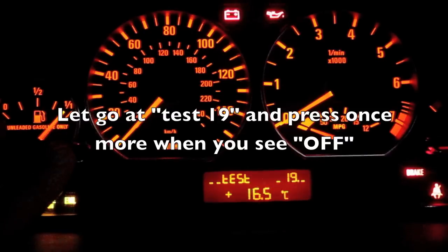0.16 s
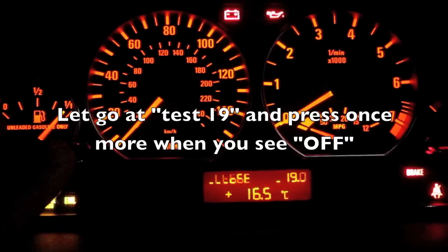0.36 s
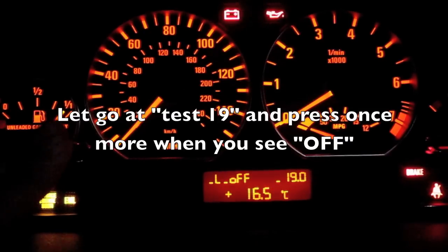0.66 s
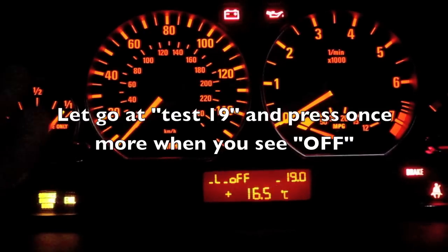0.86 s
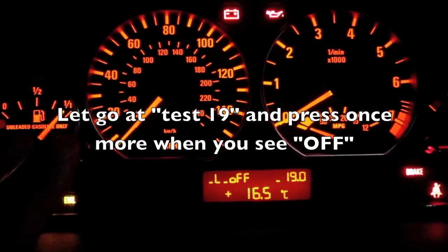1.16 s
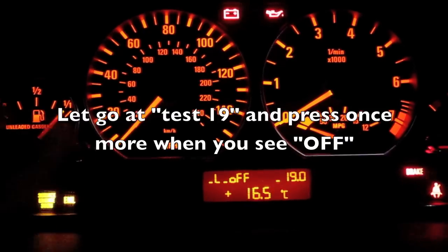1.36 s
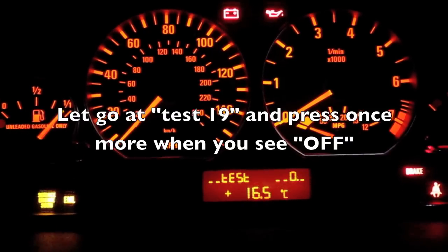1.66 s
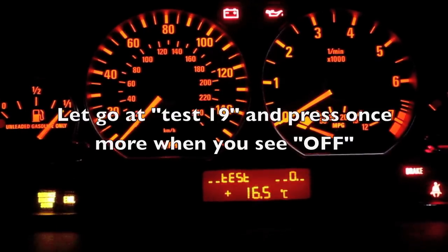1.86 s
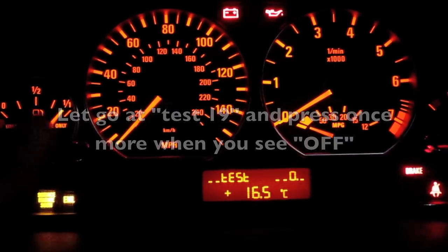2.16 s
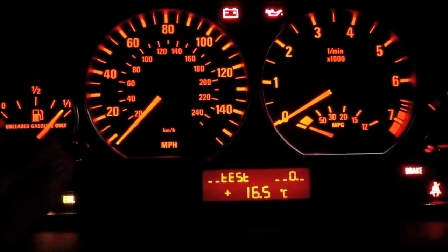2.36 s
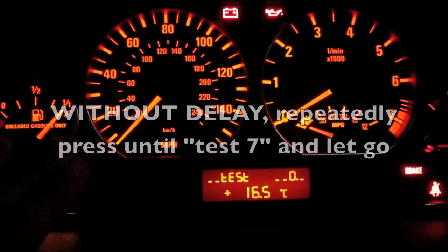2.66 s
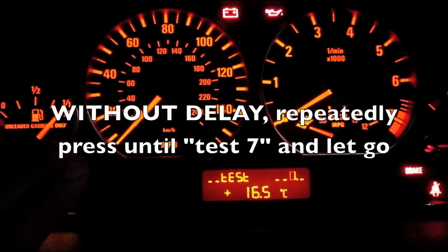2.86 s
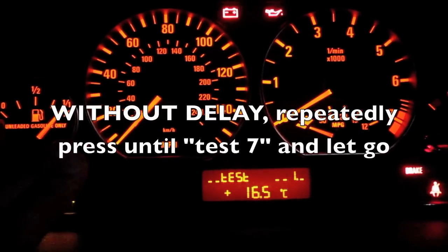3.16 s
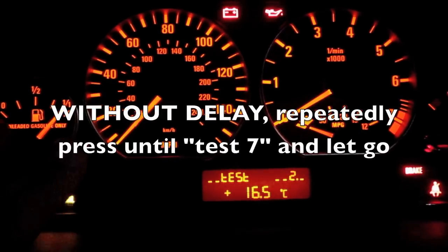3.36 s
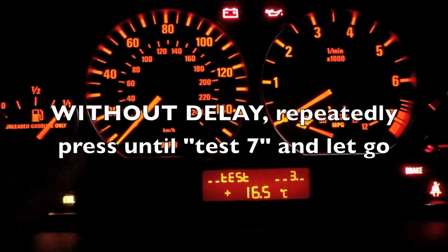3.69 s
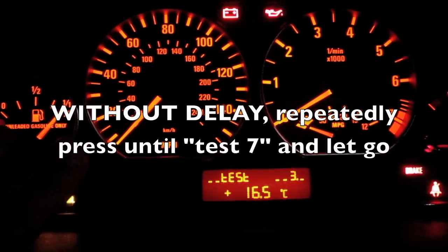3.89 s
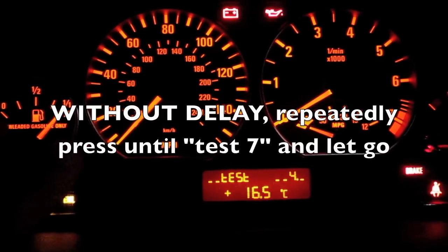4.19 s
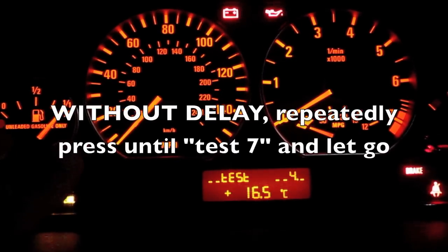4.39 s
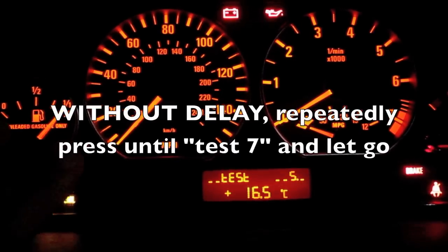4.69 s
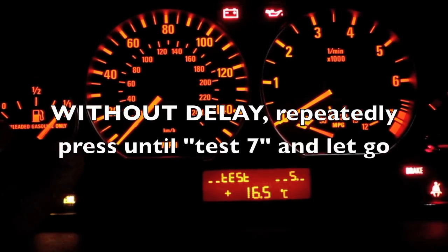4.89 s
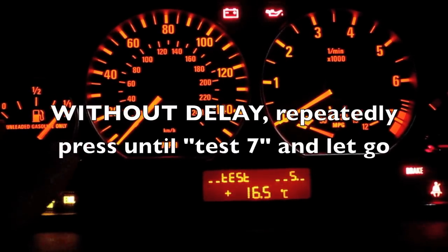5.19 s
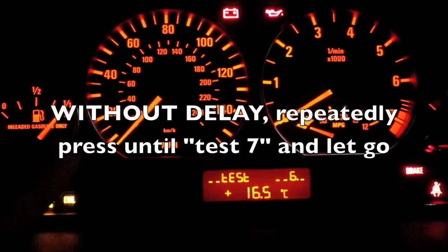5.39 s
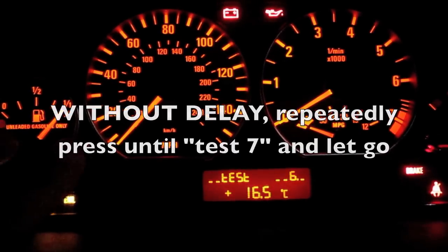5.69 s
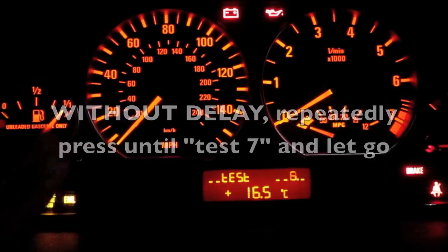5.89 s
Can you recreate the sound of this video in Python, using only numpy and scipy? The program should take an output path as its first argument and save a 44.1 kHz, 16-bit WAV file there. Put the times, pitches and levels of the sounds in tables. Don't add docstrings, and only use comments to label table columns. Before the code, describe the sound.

A small plastic dashboard button is clicked eight times inside a quiet parked car, each press a snap and knock, over a low wavering hum.

```python
import sys
import numpy as np
from scipy import signal
from scipy.fft import rfft, irfft
from scipy.io import wavfile

SR = 44100
rng = np.random.default_rng(int(sys.argv[2]) if len(sys.argv) > 2 else 0)


def level_to_linear(level):
    exponent = np.asarray(level, float) / 20
    return 10 ** exponent


def to_wav(s):
    ch = np.atleast_2d(s).T
    pcm = np.round(np.clip(ch, -1, 1) * 32767)
    wavfile.write(sys.argv[1], SR, pcm.astype(np.int16))


N = 266452


def rms_one(x):
    return x / np.sqrt(np.mean(x ** 2) + 1e-20)


def ring(x, hz, t60_s):
    radius, turn = level_to_linear(-60 / (t60_s * SR)), 2 * np.pi * hz / SR
    return signal.lfilter([0, np.sin(turn)], [1, -2 * radius * np.cos(turn), radius ** 2], x + 1e-18)


def coloured(points):
    hz, level_db = np.transpose(points)
    log_hz = np.log(np.arange(N // 2 + 1) * SR / N + 1)
    shape = level_to_linear(np.interp(log_hz, np.log(hz), level_db, left=-99, right=-99))
    return rms_one(irfft(rfft(rng.standard_normal(N)) * shape, N))


def wavering(hz, width_hz):
    return rms_one(ring(rng.standard_normal(N), hz, 3.2 / width_hz))


# (frequency [Hz], density [dB per Hz])
HISS_SPECTRUM = [(600, -0.5), (1500, 3), (3000, -4.5), (6300, -5.5), (9000, -5), (12400, -6.5),
                 (15600, -14.5), (16000, -55), (16500, -58)]


def microphone_hiss():
    return level_to_linear(-60.5) * coloured(HISS_SPECTRUM)


# (frequency [Hz], density [dB per Hz])
RUMBLE_SPECTRUM = [(8, -25), (14, -44), (25, -10), (36, -23), (45, 0), (60, -4), (100, -11), (160, -14),
                   (190, -15.5), (270, -22), (430, -27), (1500, -40), (2000, -48)]
# (frequency [Hz], width [Hz])
CABIN_HUMS = [(48.5, 4), (73, 6)]
# (frequency [Hz], width [Hz], level [dB])
CABIN_DRONES = [(103.2, 16, -55.5), (139.5, 3.8, -59.5)]
# (time [s], level [dB])
CABIN_SWAY = [(0.0, -30), (0.03, -48.5), (0.49, -53), (0.54, -62.5), (2.39, -46), (2.47, -49.5),
              (4.05, -43.5), (4.27, -54), (5.63, -47.5), (5.7, -61), (5.9, -52), (6.04, -61)]


def cabin_floor():
    t = np.arange(N) / SR
    sway_db = np.interp(t, *np.transpose(CABIN_SWAY))
    swing_db = sway_db - sway_db.mean()
    low_hum, high_hum = CABIN_HUMS
    out = level_to_linear(-46 + 0.05 * swing_db) * coloured(RUMBLE_SPECTRUM)
    out += level_to_linear(sway_db + 1.5) * wavering(*low_hum)
    out += level_to_linear(-52 - 0.37 * swing_db) * wavering(*high_hum)
    out += sum(level_to_linear(level_db) * wavering(hz, width_hz) for hz, width_hz, level_db in CABIN_DRONES)
    whine = np.sqrt(2) * np.sin(2 * np.pi * 15734 * t)
    return out + level_to_linear(-89) * whine


# (start [s], end [s], frequency [Hz], level [dB])
SPRING_SQUEAKS = [(1.225, 1.23, 5100, -58), (2.971, 2.993, 5720, -56), (2.973, 2.985, 3860, -63),
                  (2.99, 3.013, 5020, -57), (3.562, 3.573, 4100, -56), (3.805, 3.822, 4900, -58),
                  (4.27, 4.29, 5100, -58), (4.475, 4.49, 5070, -60), (4.935, 4.964, 6550, -59),
                  (5.543, 5.6, 6400, -62), (5.548, 5.588, 4920, -63), (5.608, 5.648, 5140, -58)]


def spring_squeaks():
    out, white = np.zeros(N), rng.standard_normal(N)
    for start_s, end_s, hz, level_db in SPRING_SQUEAKS:
        part = slice(int(start_s * SR), int(end_s * SR))
        whistle = rms_one(ring(ring(white[part], hz, 0.018), hz, 0.013))
        out[part] += level_to_linear(level_db) * whistle * np.hanning(len(whistle)) ** 0.5
    return out


# (frequency [Hz], width [Hz], level [dB])
SPRING_COILS = [(3120, 190, 1), (4110, 340, -4.5), (5100, 160, -2.5), (6440, 140, 1), (10100, 300, -11),
                (11600, 270, -12)]


def coil_hiss():
    drive = rng.standard_normal((len(SPRING_COILS), N))
    flicker = signal.lfilter([1], [1, -1.996, 0.996004], drive)
    out = np.zeros(N)
    for (hz, width_hz, level_db), own in zip(SPRING_COILS, flicker):
        out += level_to_linear(level_db + 6 * rms_one(own)) * wavering(hz, width_hz)
    return rms_one(out)


def stem_slips():
    slips = rng.random(N) < 700.0 / SR
    slips = slips * level_to_linear(0.83 * np.minimum(rng.exponential(1, N), 3))
    pitches_hz, dealt = np.geomspace(900, 6800, 16), rng.integers(0, 16, N)
    return rms_one(sum(ring(slips * (dealt == k), hz, 0.0071) for k, hz in enumerate(pitches_hz)))


def strokes():
    pushes = [(s - travel_s, s + 0.014, rub_db - 1, rub_db, -10.5)
              for s, _, _, travel_s, rub_db in BOTTOMINGS]
    slides = [(s + 0.0015, s + 0.066, first_db, last_db, -12.5)
              for s, _, first_db, last_db in LIFT_OFFS]
    return pushes + slides


# (frequency [Hz], density [dB per Hz])
RUB_SPECTRUM = [(300, -5), (1000, 7), (2000, -3.5), (3600, -15), (4200, -8), (4600, -10.5), (5050, -8),
                (5600, -8), (6400, -7), (6900, -16.5), (7600, -5)]
# (frequency [Hz], density [dB per Hz])
SCRATCH_SPECTRUM = [(8000, 5), (10000, 4), (13000, -1), (15500, -10)]


def stem_travel():
    out, t = np.zeros(N), np.arange(N) / SR
    grip = signal.lfilter([1], [1, -1.98, 0.9801], rng.standard_normal(N))
    grain = level_to_linear(2.8 * rms_one(grip))
    rub = rms_one(grain * coloured(RUB_SPECTRUM) + level_to_linear(-6.5) * stem_slips())
    rub += level_to_linear(-13.5) * coil_hiss()
    scratch = rms_one(grain * coloured(SCRATCH_SPECTRUM))
    for start_s, end_s, start_db, end_db, bright_db in strokes():
        part = slice(int((start_s - 0.03) * SR), int((end_s + 0.04) * SR))
        corners_s = [start_s - 0.008, start_s + 0.004, end_s - 0.003, end_s + 0.008]
        level = np.interp(t[part], corners_s, [0, level_to_linear(start_db), level_to_linear(end_db), 0])
        out[part] += level * (rub[part] + level_to_linear(bright_db) * scratch[part])
    return out


# (time [s], knock [dB], panel thud re knock [dB], prior travel [s], rub [dB])
BOTTOMINGS = [
    (1.235, -23, -5, 0.039, -45.5),
    (2.643, -20, -8, 0.06, -50.5),
    (3.028, -20.5, -8, 0.059, -52.5),
    (3.448, -21, -8, 0.077, -55.5),
    (3.851, -23, -5, .063, -52),
    (4.317, -21.5, -6.5, 0.075, -55.5),
    (5.001, -18.5, -10, 0.072, -50.5),
    (5.64, -19.5, -9, 0.14, -58.5),
]
# (time [s], knock [dB], first rub [dB], last rub [dB])
LIFT_OFFS = [
    (1.381, -25.5, -44.5, -56),
    (2.735, -24, -50, -76),
    (3.142, -24, -50.5, -70),
    (3.553, -24, -51.5, -63),
    (3.979, -24.5, -51.5, -52.5),
    (4.447, -25, -53.5, -56.5),
    (5.129, -24, -50, -49.5),
    (5.781, -24.5, -52, -43.5),
]
# (time [s], knock [dB], panel thud re knock [dB], hardness [dB per octave])
UPPER_STOPS = [
    (1.422, -16.5, -13, -1.5),
    (2.81, -44.5, 9.5, -5),
    (3.211, -30.5, -1.5, -6.5),
    (3.739, -26, -6.5, -7.5),
    (4.046, -16.5, -9, -3),
    (4.533, -16, -13.5, 5.5),
    (5.197, -21.5, -10, -5),
    (5.835, -20, -7.5, -7),
]
# (time [s], knock [dB], panel thud re knock [dB], hardness [dB per octave])
FINGER_TOUCHES = [(1.107, -35, -7.5, -5), (1.159, -40.5, -6, -4), (1.198, -35, -24, 3), (2.26, -35, -2, 3),
                  (2.387, -43, -17, 3), (2.4, -30, -7, -3.5), (2.509, -47, -2.5, 0), (2.589, -35, -20, 9),
                  (2.716, -40, -6.5, -9), (2.799, -45, -4, -6), (3.118, -42.5, -6, -6),
                  (3.314, -44, -7, -9), (3.691, -30, -40, -6), (4.157, -33, -21, -4),
                  (4.505, -33.5, -20, -8), (4.92, -41, -17, -1), (5.094, -42.5, -4.5, -7),
                  (5.307, -50, 0, -5), (5.746, -49.5, -4, 2)]
# (time [s], knock [dB], stem tick re knock [dB], dome rattle re knock [dB])
STEM_CATCHES = [(1.216, -35.5, -8, -9), (1.286, -35.5, -7, -3.5), (1.294, -25, -2.5, -11),
                (2.607, -43, 0, -3.5), (2.875, -37, -4, -12), (2.995, -40.5, -8, -4),
                (3.825, -38.5, -7, -8.5), (4.293, -40, -4, -6.5), (4.486, -41, -3.5, -19),
                (4.971, -40.5, -4, -8), (5.814, -30.5, -6, -22)]


def contacts():
    rows = [(s, db, -7, -22, -44, -8, 1) for s, db, *_ in LIFT_OFFS]
    rows += [(s, db, panel_db, -17, -10, -4.5, 0) for s, db, panel_db, *_ in BOTTOMINGS]
    rows += [(s, db, panel_db, -20, -40, hard_db, 1) for s, db, panel_db, hard_db in UPPER_STOPS]
    rows += [(s, db, panel_db, -23.5, -33, hard_db, 1) for s, db, panel_db, hard_db in FINGER_TOUCHES]
    rows += [(s, db, -13.5, stem_db, dome_db, 8.5, 0) for s, db, stem_db, dome_db in STEM_CATCHES]
    return np.transpose(rows)


def alike(kinds, size):
    likeness = 0.6
    shared = rng.standard_normal((2, size))
    own = rng.standard_normal((len(kinds), size))
    return likeness * shared[kinds] + np.sqrt(1 - likeness ** 2) * own


def struck(modes, share_db, chatter_s, chatter_db, spread_db, tail_t60_s, tail_db, band_hz, rise_s,
           grip, hard_share):
    at_s, peak_db, *_, hard_db, still = contacts()
    kinds, lag = still.astype(int), np.arange(4500)
    force = level_to_linear(chatter_db) * np.exp(-lag / (chatter_s * SR))
    force = force + level_to_linear(tail_db - 60 * lag / (tail_t60_s * SR))
    force = force * alike(kinds, size=len(lag))
    force[:, 0] = 1

    hz, press_db, release_db, t60_s = np.transpose(modes)
    held_hz = hz * (1 + 0.018 * alike(kinds, size=len(modes)))
    decay = level_to_linear(-60 * lag / (grip * t60_s[:, None] * SR))
    rings = decay * np.sin(2 * np.pi * held_hz[..., None] * lag / SR)
    rings *= 1 - np.exp(-lag / (rise_s * SR))
    strength_db = np.array([press_db, release_db])[kinds]
    strength_db = strength_db + hard_share * hard_db[:, None] * np.log2(hz / hz.mean())
    strength_db = strength_db + spread_db * alike(kinds, size=len(modes))
    bodies = np.sum(level_to_linear(strength_db)[..., None] * rings, axis=1)

    knocks = signal.fftconvolve(force, bodies, axes=1)[:, :len(lag)]
    radiating = signal.butter(2, band_hz, "band", fs=SR, output="sos")
    knocks = signal.sosfilt(radiating, knocks)
    knocks /= np.sqrt(np.mean(knocks[:, :600] ** 2, axis=1, keepdims=True))
    knocks *= level_to_linear(peak_db + share_db)[:, None]
    out = np.zeros(N + len(lag))
    np.add.at(out, np.round(at_s[:, None] * SR).astype(int) + lag, knocks)
    return out[:N]


# (frequency [Hz], on press [dB], on release [dB], t60 [s])
PANEL_MODES = [(133.4, -9.5, -16, 0.077), (204, -10, -12, 0.061), (263, -18, -13, 0.087),
               (363, -20.5, -10.5, 0.053), (410.8, -7.5, -4.5, 0.074), (434, -1.5, -3.5, 0.087),
               (483, -3, -1.5, 0.076), (557.6, 1, -1.5, 0.089), (612, 0, -4, 0.084),
               (674, -7.5, -11.5, 0.066)]


def panel(panel_db):
    return struck(PANEL_MODES, panel_db - 1, chatter_s=0.001, chatter_db=-32.5, spread_db=2.5,
                  tail_t60_s=0.14, tail_db=-43.5, band_hz=[139, 700], rise_s=0.0022, grip=0.75, hard_share=0.9)


# (frequency [Hz], on press [dB], on release [dB], t60 [s])
CAP_MODES = [(936, -27.5, -10, 0.22), (969, -9.5, -5, 0.088), (1053.6, -5, -6.5, 0.083),
             (1090, -32, 0, 0.063), (1234, 8, 5.5, 0.031), (1339, 5.5, 12, 0.031), (1483, 6, 8.5, 0.019),
             (1582, 12, 9, 0.02), (1696, 0.5, 8, 0.018), (1860, -4, -3, 0.055), (2074, 4, 2, 0.037),
             (2200, -43, -1, 0.017)]


def cap():
    return struck(CAP_MODES, -13.0, chatter_s=0.00072, chatter_db=-16.5, spread_db=3.0,
                  tail_t60_s=0.065, tail_db=-27.5, band_hz=[760, 2620], rise_s=0.00052, grip=0.7, hard_share=1.3)


# (frequency [Hz], on press [dB], on release [dB], t60 [s])
STEM_MODES = [(2360, 6, 8, 0.0095), (2876, 5, 7, 0.011), (3330, 5.5, 10, 0.0083), (3670, -21, -13, 0.0012),
              (4100, 5, 9, 0.0052), (4450, 6, -17, 0.0017), (5010, 3, -2, 0.0051), (6550, 10, -21, 0.0029),
              (6400, -18, 8.5, 0.0012)]


def stem(stem_db):
    return struck(STEM_MODES, stem_db - 8.5, chatter_s=0.0033, chatter_db=-1.5, spread_db=2.5,
                  tail_t60_s=0.12, tail_db=-19, band_hz=[2200, 7500], rise_s=0.000075, grip=0.69, hard_share=0.36)


# (frequency [Hz], on press [dB], on release [dB], t60 [s])
DOME_MODES = [(7830, 7.5, -6, 0.0023), (9360, -7.5, -15, 0.0099), (9830, -4.5, 4, 0.012),
              (10550, -4, 11, 0.011), (10860, 6.5, -4, 0.0038), (11600, -18, -10, 0.0041),
              (12400, -26, -3, 0.0019), (14400, -17, -16, .004), (15200, -11, -4, 0.0038)]


def dome(dome_db):
    return struck(DOME_MODES, dome_db - 5.5, chatter_s=0.0019, chatter_db=10, spread_db=-2.0,
                  tail_t60_s=0.078, tail_db=-9, band_hz=[8200, 15600], rise_s=0.00045, grip=0.74, hard_share=0.71)


def button():
    panel_db, stem_db, dome_db = contacts()[2:5]
    return panel(panel_db) + cap() + stem(stem_db) + dome(dome_db)


def scene():
    return (button() + stem_travel() + spring_squeaks() + cabin_floor())[None]


def low_pass(x):
    return signal.sosfilt(signal.butter(12, 16520, fs=SR, output="sos"), x)


def record(dry):
    heard = dry + microphone_hiss()
    heard = signal.lfilter(*signal.iirnotch(7850, 2.62, fs=SR), heard)
    heard = signal.sosfilt(signal.cheby2(14, 50, 16750, fs=SR, output="sos"), heard)
    return low_pass(heard)


dry = scene()
out = record(dry)
to_wav(out)
```